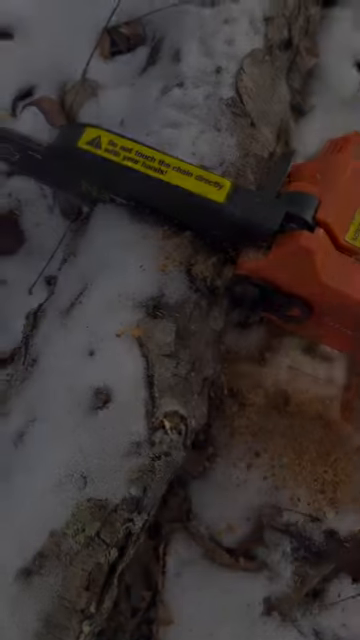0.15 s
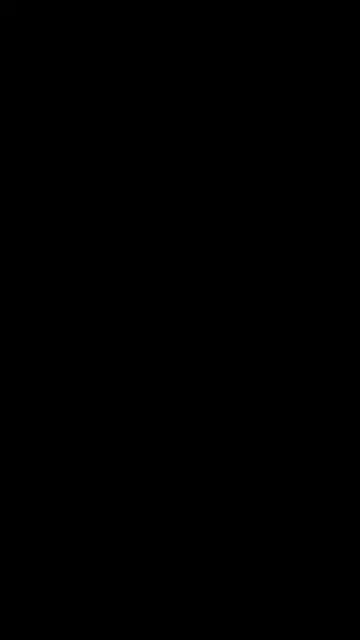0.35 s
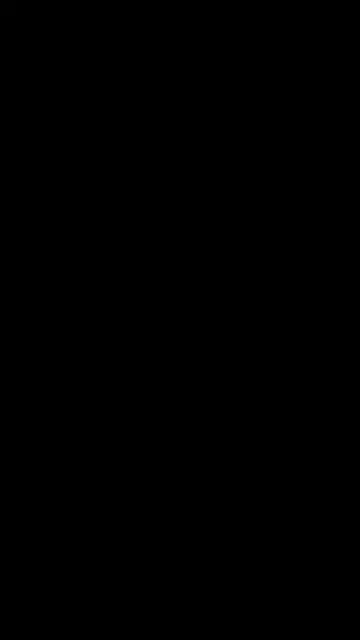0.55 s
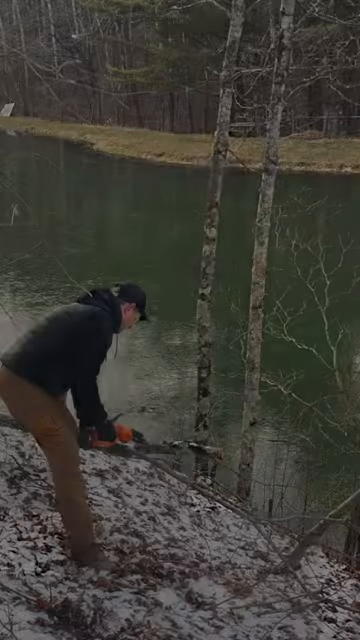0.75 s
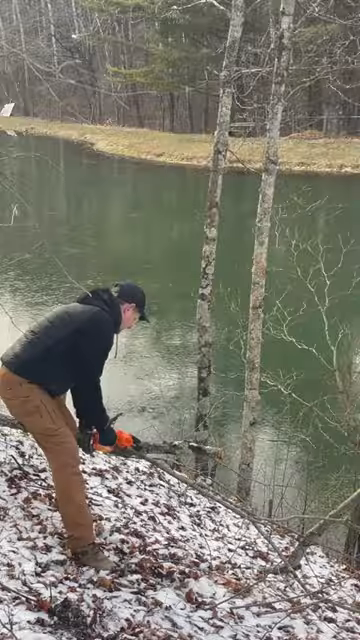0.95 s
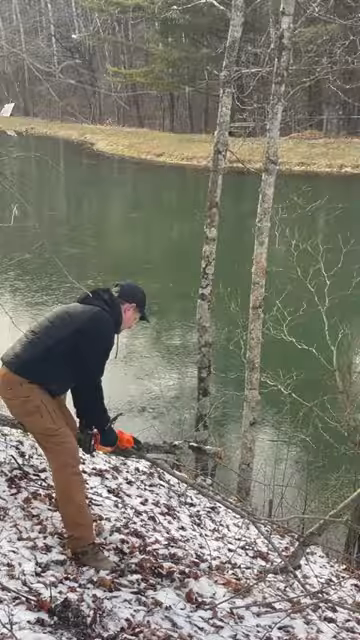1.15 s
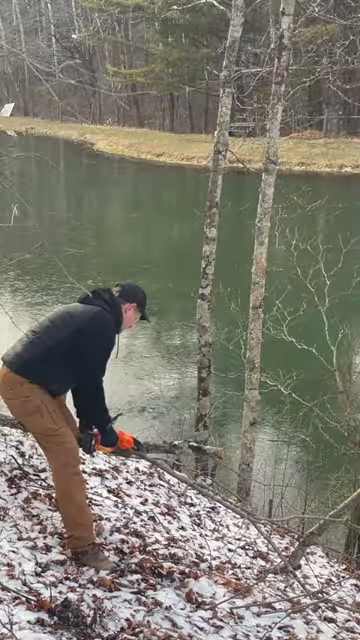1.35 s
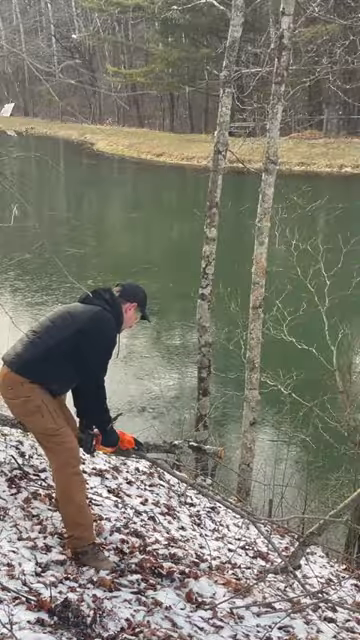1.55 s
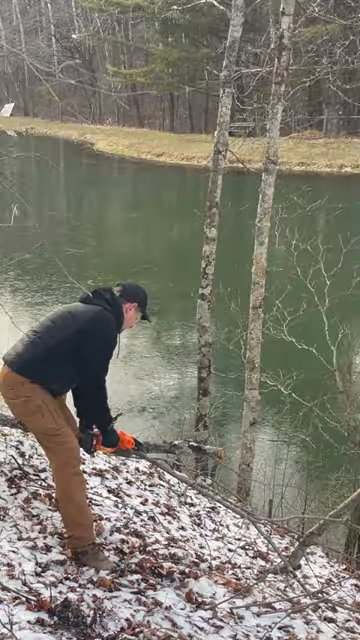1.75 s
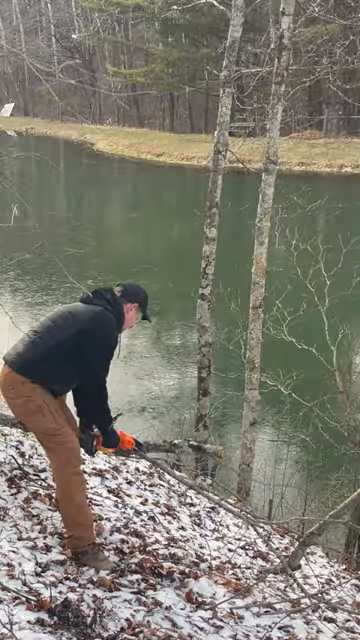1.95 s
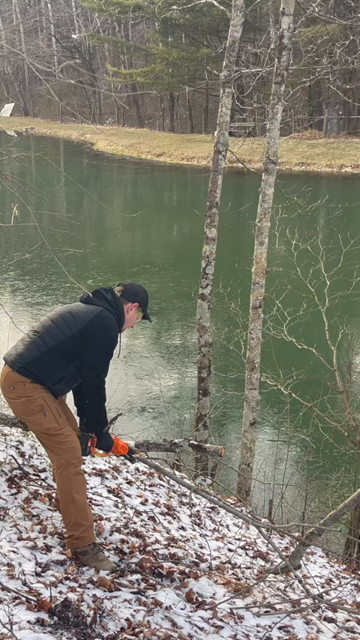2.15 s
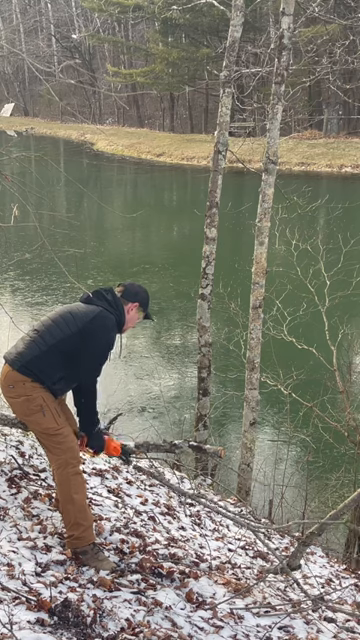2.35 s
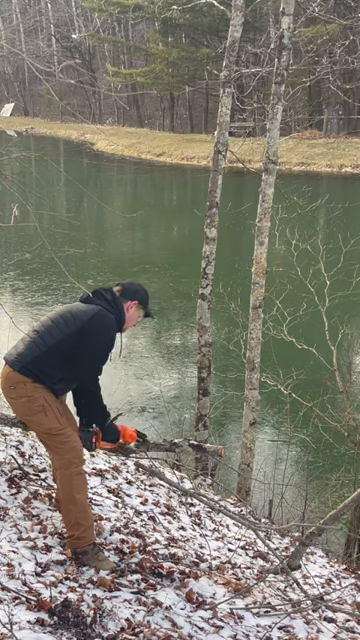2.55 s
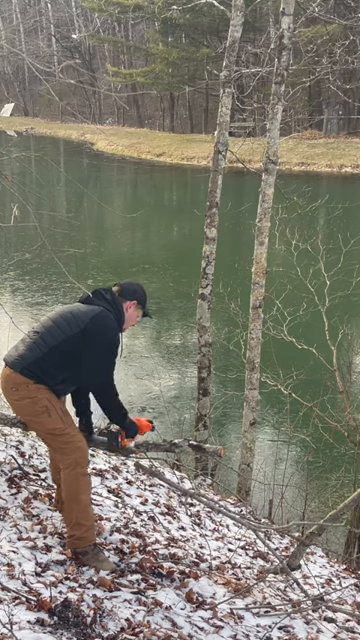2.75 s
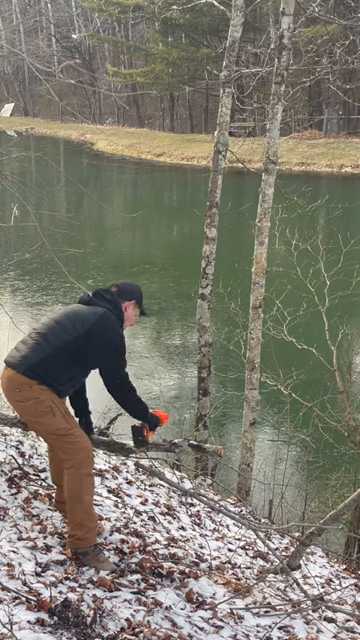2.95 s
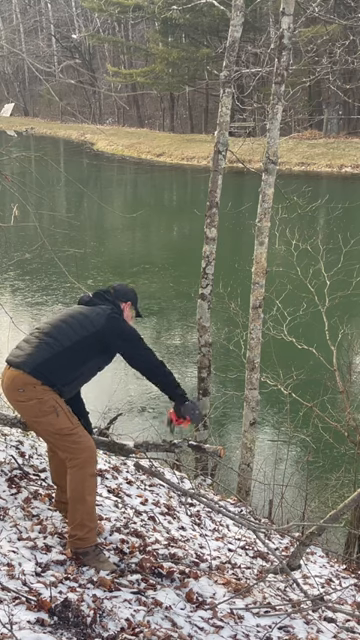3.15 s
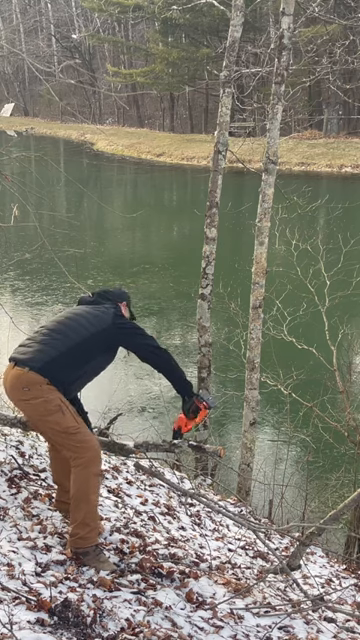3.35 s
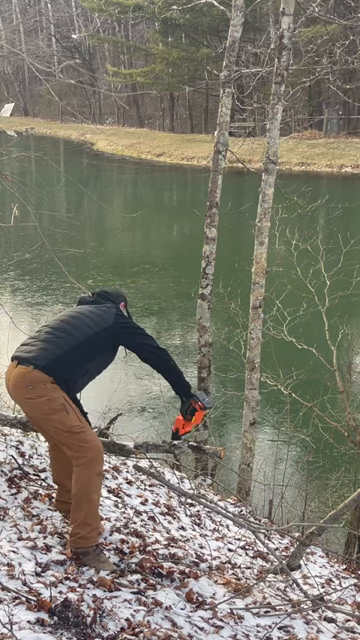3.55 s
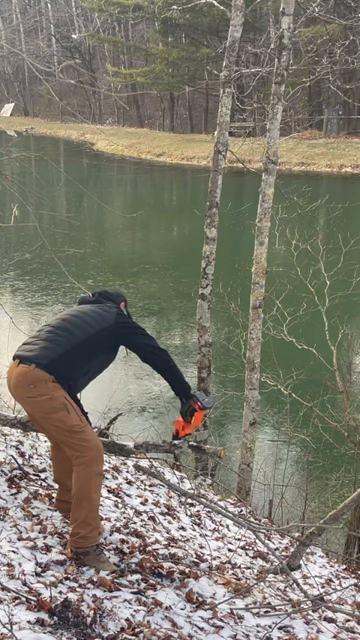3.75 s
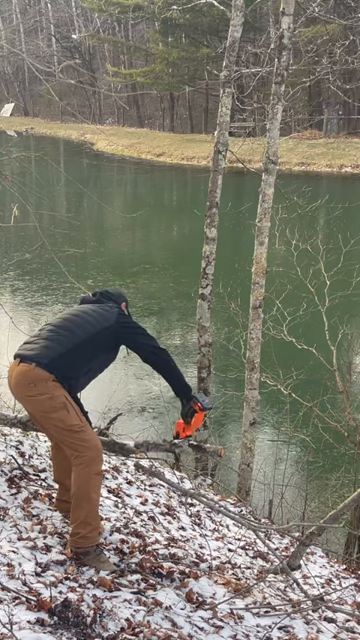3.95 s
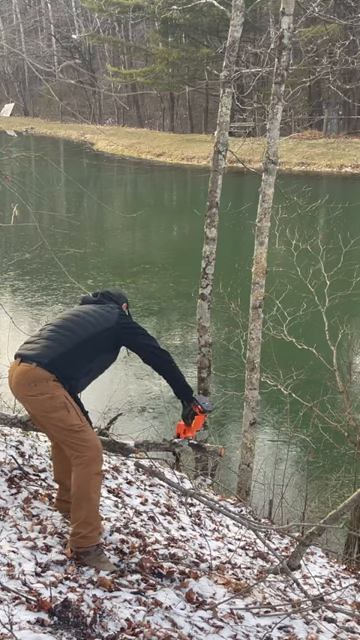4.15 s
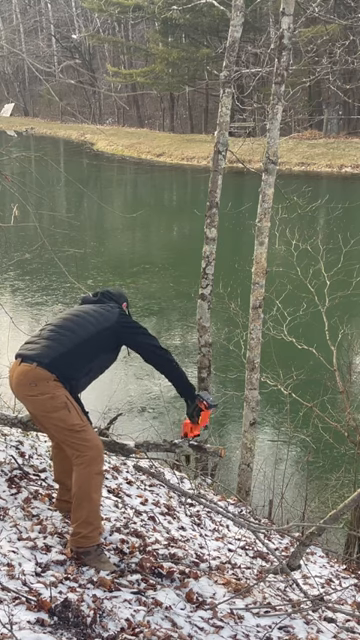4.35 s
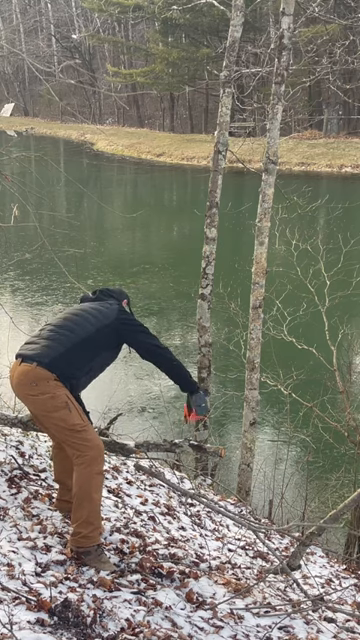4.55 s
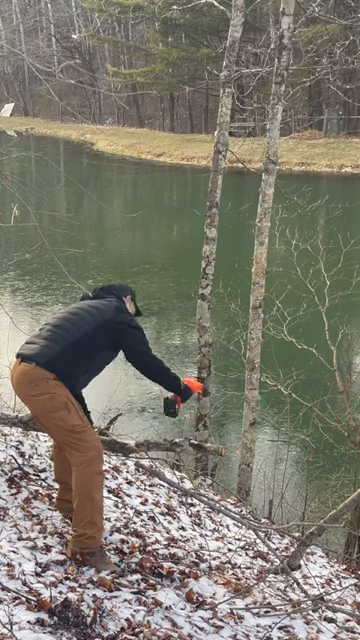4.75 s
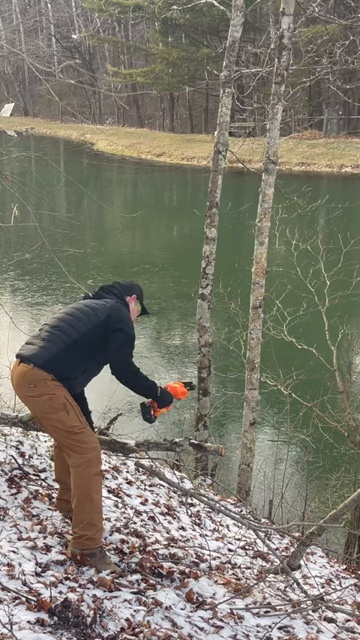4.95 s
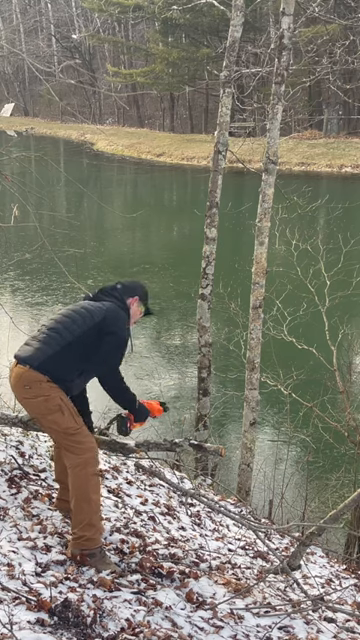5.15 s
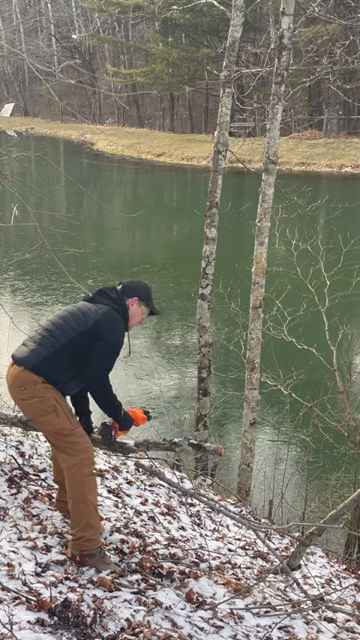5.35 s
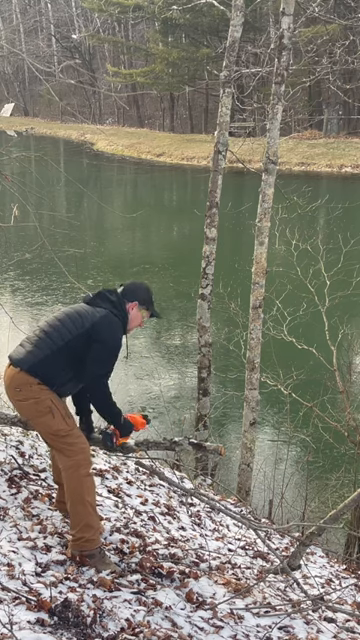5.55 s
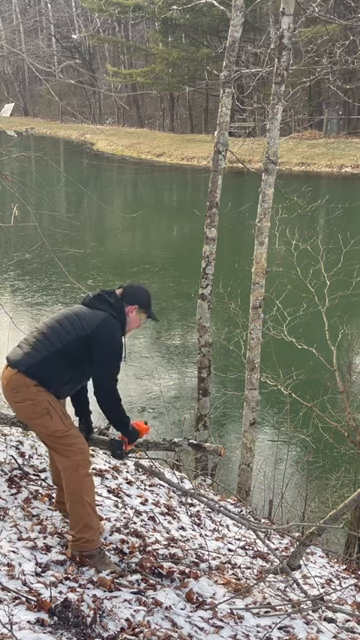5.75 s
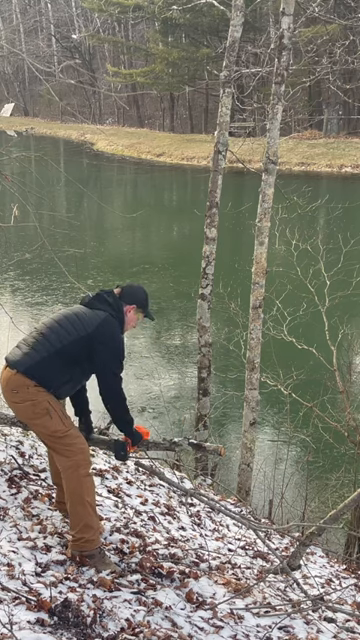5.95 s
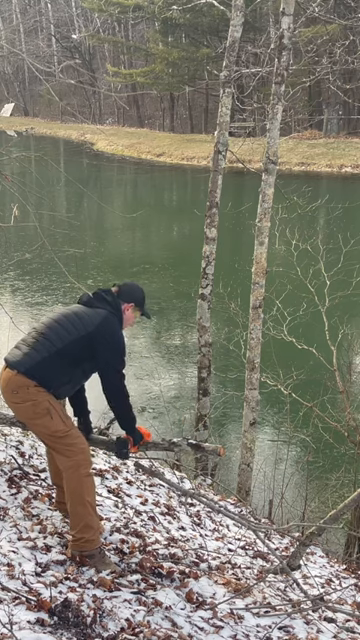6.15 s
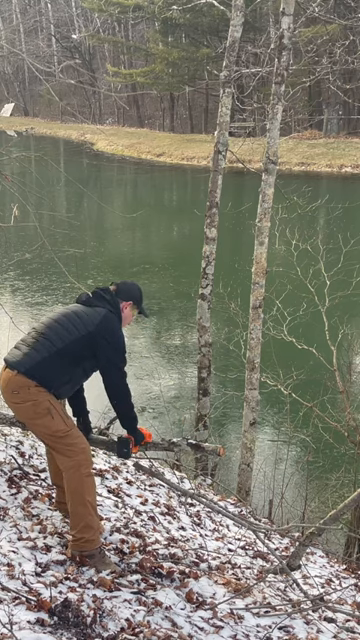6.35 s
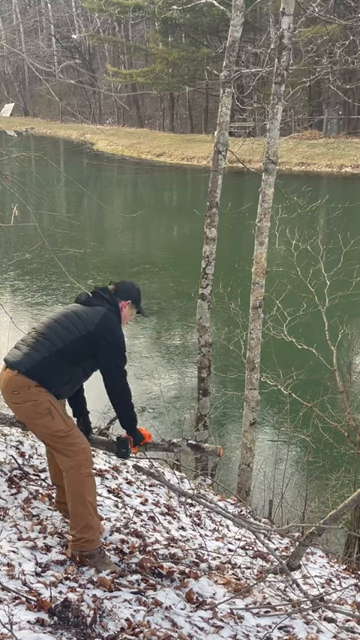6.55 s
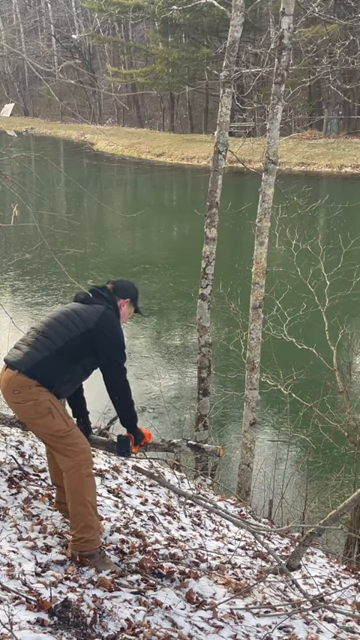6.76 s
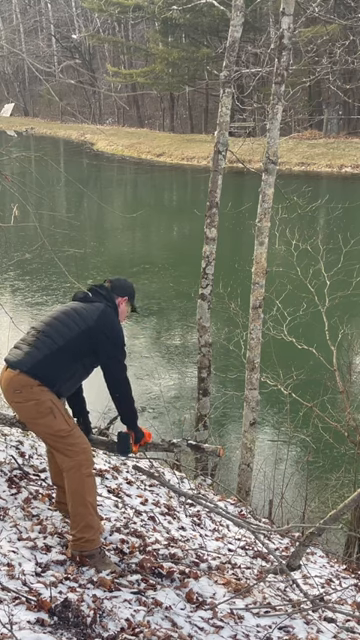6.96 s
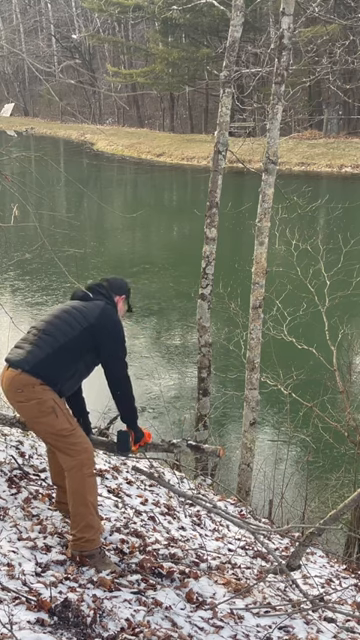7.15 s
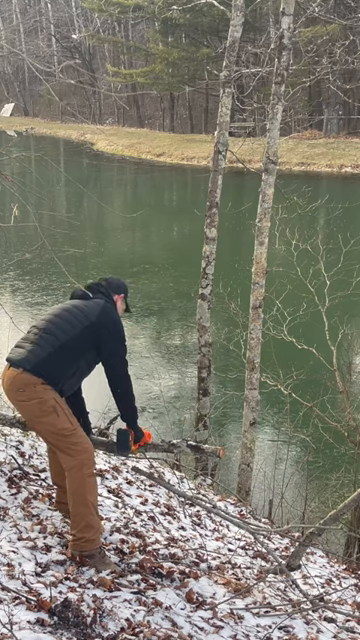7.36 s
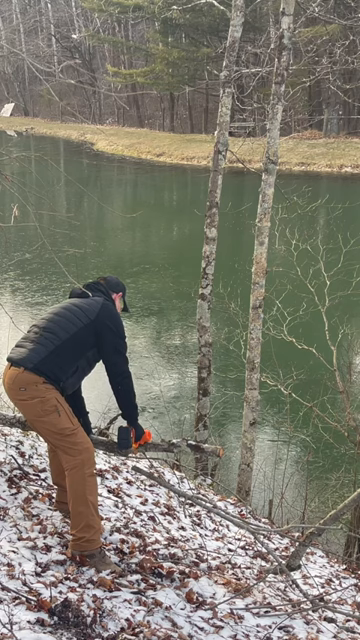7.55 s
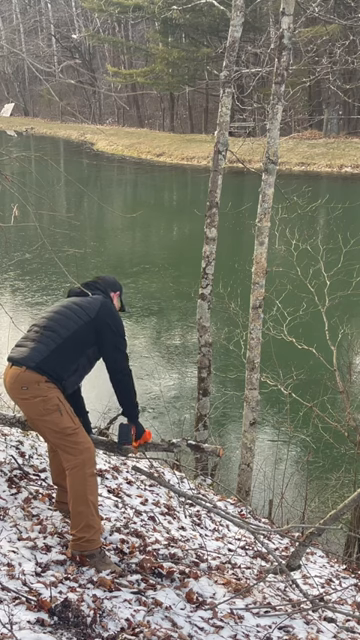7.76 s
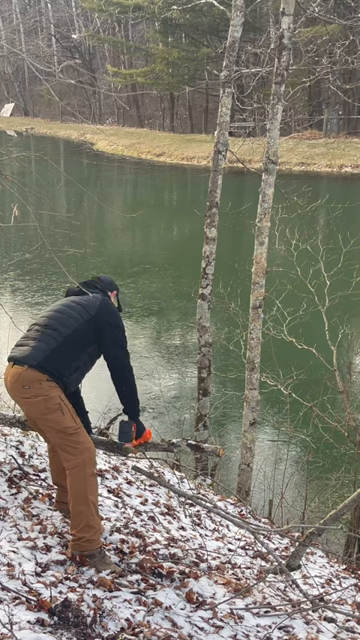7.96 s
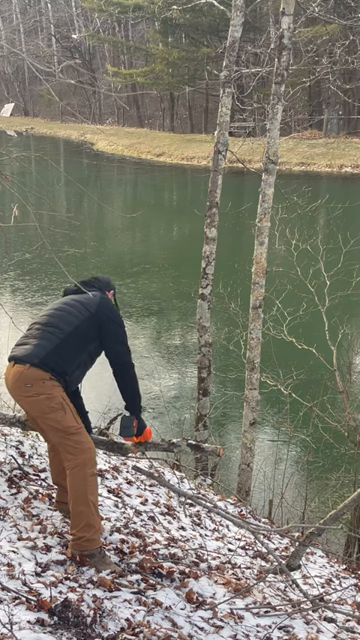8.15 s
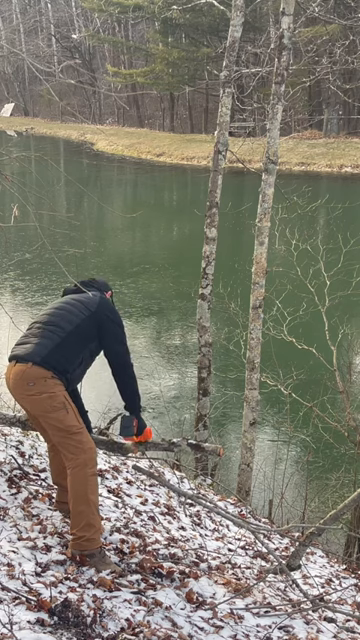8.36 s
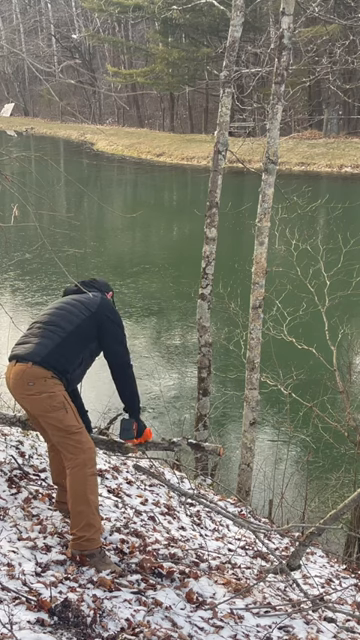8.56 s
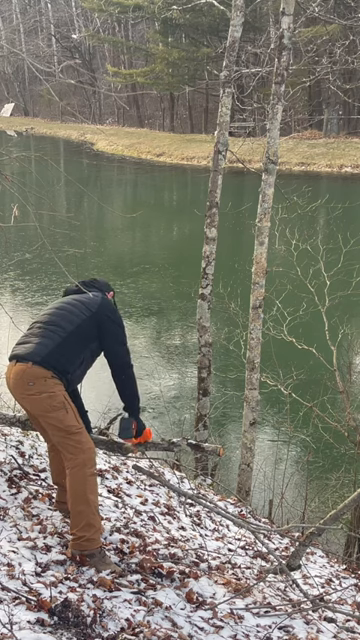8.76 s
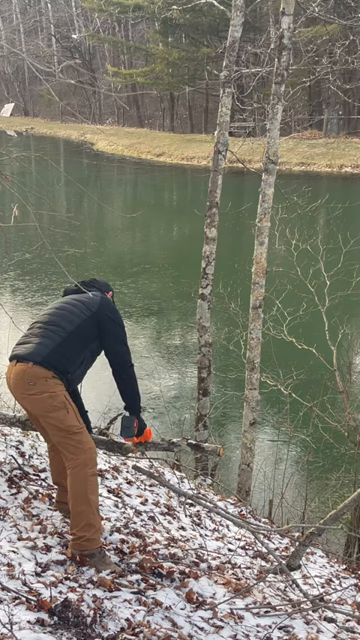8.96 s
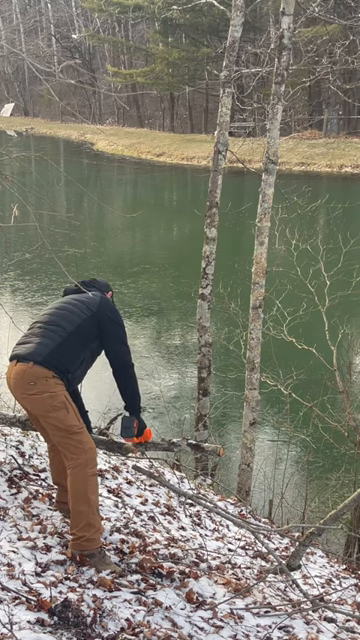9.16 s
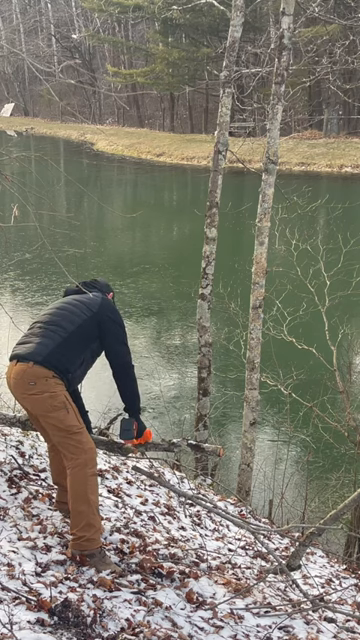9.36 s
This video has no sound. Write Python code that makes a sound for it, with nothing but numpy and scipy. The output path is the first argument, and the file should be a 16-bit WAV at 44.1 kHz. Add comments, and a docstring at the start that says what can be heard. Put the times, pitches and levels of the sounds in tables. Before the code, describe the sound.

A small battery chainsaw whirrs and rasps through a branch outdoors, stops twice with rustling pauses, then restarts and labours with squeals and snags.

```python
"""Small chainsaw in winter woods

A battery chainsaw runs outdoors among bare trees, first close by, then fading to a view from farther off.
Gear noise rings through its casing, motor tones follow its speed, and the cut adds rasp, snags and squeals.
It runs free, slows in the wood, stops twice and starts again. Far traffic-like rumble, rustling leaves,
twig ticks and a thin scattered echo from the trees fill the pauses.
The finished sound, no part of the woods, ends steeply in the treble and flickers in a narrow band on top."""
import sys
import numpy as np
from scipy import signal
from scipy.fft import rfft, irfft, next_fast_len
from scipy.io import wavfile
from scipy.ndimage import uniform_filter1d, map_coordinates

SR = 44100
rng = np.random.default_rng(int(sys.argv[2]) if len(sys.argv) > 2 else 0)


def log_audio(samples):
    """Write samples as a 16-bit WAV file to the path given in sys.argv[1]."""
    # one column per channel
    frames = np.atleast_2d(samples).T
    # limit to full scale, then quantise
    limited = np.clip(frames, -1, 1)
    pcm = np.round(limited * 32767).astype(np.int16)
    wavfile.write(sys.argv[1], SR, pcm)


def makeup_ratio(level_db):
    """Linear amplitude ratio for a level in decibels (20 dB per factor of ten)."""
    decades = np.asarray(level_db, float) / 20
    return 10 ** decades


N = 415422

# the view of the saw: fade to the far view starts, ends, then the saw is turned in each pause [s]
VIEW_TIMES = [.25, .6, 2.8, 5.2]
# how roughly the cut runs, lifting rasp and small snags: (time [s], lift [dB])
ROUGHNESS = [(0, 0), (6.2, 0), (6.6, 2.5), (7.2, 2.5), (7.9, -1), (9.42, -3)]


def unit(x):
    """Scaled to rms 1."""
    return x / np.sqrt(np.mean(x ** 2) + 1e-20)


def read(points, t):
    """A (time, value) curve read at times t."""
    return np.interp(t, *np.transpose(points))


def along(points, hz):
    """(Hz, value) points read on a log frequency axis."""
    f, v = np.transpose(points)
    return np.interp(np.log(hz + 1), np.log(f + 1), v)


def wobble(rate):
    """A smooth random curve, rate knots a second."""
    return map_coordinates(rng.standard_normal(int(N * rate / SR) + 4), [np.arange(N) * rate / SR])


def filtered(x, response):
    """x times a response of frequency."""
    m = next_fast_len(N + SR // 2)
    return irfft(rfft(x, m) * response(np.fft.rfftfreq(m, 1 / SR)), m)[..., :N]


def hiss(spectrum):
    """Noise of rms 1, coloured by (Hz, dB per Hz) points."""
    return unit(filtered(rng.standard_normal(N), lambda hz: makeup_ratio(along(spectrum, hz))))


def facing(t):
    """Share of each view of the saw (close, first, second, third) at times t."""
    place = np.interp(t, VIEW_TIMES[:2], [0, 1]) + (t > VIEW_TIMES[2]) + (t > VIEW_TIMES[3])
    return np.array([np.clip(1 - abs(place - view), 0, 1) for view in range(4)])


def motor(t):
    """Motor speed (0-1) under trigger and brake, load, bite (0-1), and the layer levels (dB) they call for."""
    # the trigger: (pressed [s], released [s])
    presses = [(-1, 2.256), (3.203, 4.49), (5.71, 11)]
    # how hard the chain bites the wood: (time [s], load [0 free, 1 heavy])
    load_curve = [(0, .8), (.47, .8), (.58, .06), (1.2, .09), (1.4, .85), (2.04, .85), (2.14, .11),
                  (2.4, .11), (3.4, .03), (3.9, .03), (4.05, .5), (4.09, .2), (4.18, 1), (4.28, .1),
                  (4.32, .06), (4.34, .5), (4.43, 0), (6.05, .12), (6.25, 1.05), (6.5, .75), (6.74, 1.1),
                  (6.87, .6), (6.97, 1.1), (7.2, .75), (8.2, .75), (8.31, 1.6), (8.41, 1), (8.65, 1),
                  (8.8, .65), (9.1, 1), (9.27, .55), (9.42, .75)]
    # one row a view (close, first, second, third), each column pair free then cutting: (whine [dB] x2,
    # once-a-turn tone [dB] x2, casing band below 2.2 kHz against the whirr [dB] x2, rasp [dB] x2)
    layer_levels = [(-60, -60, -70, -70, -3.5, -3.5, -50, -50),
                    (-40, -45, -51, -55, -8.5, -6.5, -63, -46.5), (-36, -36, -47, -52, 1, -2, -67, -48.5),
                    (-35.5, -45, -50, -62, -4.5, -2.7, -62, -47)]
    spin_up_s, spin_up_bend = .09, 2  # time constant and shape of the rise
    brake_s, brake_bend = .122, 3  # time to standstill and shape of the fall
    touch, sink = .12, .3  # load at which the cutters touch the wood, and how much more sinks them fully
    speed = 0
    for on, off in presses:
        rise = 1 - np.exp(-(np.clip(t - on, 0, None) / spin_up_s) ** spin_up_bend)
        fall = 1 - np.clip((t - off) / brake_s, 0, 1) ** brake_bend
        speed = speed + rise * fall
    load = np.clip(read(load_curve, t), 0, None)
    bite = np.clip((load - touch) / sink, 0, 1)
    db = np.transpose(layer_levels) @ facing(t)
    free_db, cutting_db = db[0::2], db[1::2]
    return speed, load, bite, free_db + bite * (cutting_db - free_db)


def colour_db(hz, t):
    """The saw's spectrum with its casing and bar resonances, changing with the view."""
    # colour of the running saw in the four views: (frequency [Hz], density [dB per Hz])
    close_colour = [(180, -33), (300, -16.5), (570, -17), (1140, -14.5), (1590, -16), (2080, -10),
                    (2840, -14.5), (4700, -13.5), (7590, -6.5), (8250, -14.5)]
    first_colour = [(180, -59), (300, -25), (480, -14.5), (800, -8), (1170, -10), (1660, -7.5),
                    (3260, -5.5), (5490, -5), (6500, -3), (8690, -2), (9400, -8)]
    second_colour = [(180, -50), (300, -26.5), (480, -12), (760, -6), (950, -11), (1400, -11), (1770, 0),
                     (2200, -9), (3260, -12.5), (6910, -15.5), (8690, -8), (9500, -13)]
    third_colour = [(180, -41), (300, -22), (450, -8.5), (718, -2.5), (1210, -9), (1720, -2), (2550, -4.5),
                    (3210, -5), (5500, -8.5), (6910, -10), (8050, -3), (9380, -12)]
    # casing and bar resonances: (centre [Hz], width [Hz], lift close, first, second, third view [dB])
    resonances = [(795, 160, -0.5, 2, 4.7, 7.7), (1730, 170, 4, 3.1, 4.55, 4.6),
                  (2850, 52, -3, 1.8, 0.34, 1.4), (3500, 41, 5.5, 2.3, 4.5, 1.3),
                  (3980, 360, 5.5, 5.8, 3.4, 3.7), (6250, 280, 2.5, 3.3, 3.8, 4.2),
                  (8400, 570, 0.5, 1, 0.68, 2)]
    colours = (close_colour, first_colour, second_colour, third_colour)
    views = np.array([along(colour, hz) for colour in colours])
    for centre_hz, width_hz, *lift_db in resonances:
        views = views + np.outer(lift_db, 1 / (1 + (2 * (hz - centre_hz) / width_hz) ** 2))
    return views.T @ facing(t)


def gears(turn):
    """Gear and chain rattle: noise pulsing once a motor turn, through the casing."""
    drive = rng.standard_normal(N) * (1 + .22 * np.cos(turn)) * makeup_ratio(0.94 * wobble(160))
    hz, t, z = signal.stft(drive, SR, nperseg=512)
    field = makeup_ratio(colour_db(hz, t))
    high, low = (hz > 3300) & (hz < 9500), (hz > 500) & (hz < 2200)
    field = field / np.sqrt(np.sum(field[high] ** 2, axis=0) / len(hz))  # the whirr sets the level
    casing_db = motor(t)[3][2] - 10 * np.log10(np.sum(field[low] ** 2, axis=0) / len(hz))
    lean = np.clip((3000 - hz) / 800, 0, 1)  # load shifts power between casing and whirr
    patches = uniform_filter1d(rng.standard_normal(z.shape), size=5, axis=0)
    patches = uniform_filter1d(patches, size=9, axis=1)
    z = z * field * makeup_ratio(np.outer(lean, casing_db - 1.0) + 1.5 * unit(patches))
    return signal.istft(z, SR, nperseg=512)[1][:N]


def motor_tones(turn, whine_db, shaft_db, uneven):
    """The whine sounds twice a motor turn, the shaft tone once; both waver in level."""
    whine = makeup_ratio(whine_db + 1.5 * wobble(30) + 3 * uneven * wobble(8)) * np.sin(2 * turn)
    shaft = makeup_ratio(shaft_db + 0.77 * wobble(25)) * np.sin(turn)
    return np.sqrt(2) * (whine + shaft)


def cutting_rasp(teeth, rasp_db, bite):
    """Wood torn by the passing cutters: low noise shaped by their uneven bite."""
    # colour of the rasp: (frequency [Hz], density [dB per Hz])
    rasp_colour = [(70, -29.5), (120, -0.5), (200, 1), (330, -10.5), (520, -1.5), (900, -23), (2000, -42)]
    rough_db = bite * read(ROUGHNESS, np.arange(N) / SR)
    return makeup_ratio(rasp_db + rough_db + 3 * wobble(12)) * unit(teeth * hiss(rasp_colour))


def squeals(teeth):
    """Narrow, rough notes that slide and change level as the bar works in the wood, throbbing with the cutters."""
    # squeal of bar and chain in the kerf, one row a note:
    # (start [s], end [s], first pitch [Hz], last pitch [Hz], first level [dB], last level [dB])
    notes = [(0, .16, 2490, 2470, -28, -29), (.16, .55, 2360, 2520, -33, -41),
             (1.39, 2.12, 6250, 6030, -33, -40), (5.755, 5.82, 2660, 2610, -30, -36),
             (5.85, 6.1, 2780, 2900, -41, -39), (6.12, 6.32, 2920, 3030, -37, -32),
             (6.29, 6.86, 2580, 2450, -33, -39), (6.875, 6.93, 2640, 2440, -30, -33),
             (6.93, 7.14, 2510, 2460, -33, -37), (7.15, 8, 2510, 2400, -34, -38),
             (7, 7.6, 3540, 3470, -44, -39), (7.58, 8.2, 3470, 3440, -36, -40),
             (7.97, 8.2, 2380, 2130, -38, -40), (8.22, 8.42, 2330, 2560, -34, -33),
             (8.4, 8.7, 2930, 2910, -35, -34), (8.69, 9.06, 2550, 2600, -32, -33),
             (9.03, 9.42, 2920, 2950, -36, -40), (9.13, 9.45, 2590, 2580, -33, -31),
             (8.65, 9.45, 7780, 7800, -36, -36)]
    t, out = np.arange(N) / SR, np.zeros(N)
    for start, end, first_hz, last_hz, first_db, last_db in notes:
        done = np.interp(t, [start, end], [0, 1])
        fade = np.interp(t, [start - .02, start + .01, end - .03, end + .02], [0, 1, 1, 0])
        width_hz = first_hz / 15
        phase = 2 * np.pi * np.cumsum(first_hz + (last_hz - first_hz) * done) / SR
        note = .65 * np.cos(phase + 1.2 * wobble(40))  # a singing core inside the rough band
        for part in (np.cos, np.sin):
            note = note + (wobble(width_hz) + .5 * wobble(2.5 * width_hz)) * part(phase)
        level_db = first_db + (last_db - first_db) * done + 2 * wobble(18)  # random swell along a note
        out += makeup_ratio(level_db) * fade * unit(teeth * note)
    return out


def saw():
    """Motor speed and load drive gears, tones and rasp; squeals and snags join at their own times."""
    # gear whirr at full speed: (time [s], level [dB])
    whirr_curve = [(0, -28.5), (.2, -30.5), (.42, -32), (.7, -30), (.95, -27.7), (1.3, -26.2), (1.6, -27.2),
                   (2.3, -28), (3.3, -33), (3.9, -29.7), (4.25, -29.5), (4.55, -32), (5.8, -31.5),
                   (6.05, -29), (6.6, -32), (7.2, -31), (7.8, -32.5), (8.4, -31), (9.42, -30.5)]
    free_hz, sag_hz, hunt_hz = 846, 150, 30  # whine running free, its drop and its hunting at load 1
    tones_grow, whirr_grows, whirr_dies = 4, .5, 1.5  # powers of the motor speed
    ring_out_s, ring_out_db = .018, -12  # the slack chain rattles on briefly
    t = np.arange(N) / SR
    speed, load, bite, (whine_db, shaft_db, _, rasp_db) = motor(t)
    hz = speed * (free_hz - load * (sag_hz + hunt_hz * wobble(9)))
    uneven = np.clip(2.5 * load - 1, 0, 1)  # a slowed motor runs unevenly
    turn = np.pi * np.cumsum(uniform_filter1d(hz, size=800)) / SR + (.06 + .5 * uneven) * wobble(70)
    tones = motor_tones(turn, whine_db, shaft_db, uneven)
    teeth = makeup_ratio(1.05 * wobble(45))  # cutters bite unevenly
    teeth = teeth * (1 + .3 * np.cos(2 * np.pi * np.cumsum(42 + 6 * wobble(8)) / SR))  # and pass in a quick throb
    rasp = cutting_rasp(teeth, rasp_db, bite)
    whirr_db = read(whirr_curve, t) + .7 * wobble(14)
    rattle = makeup_ratio(whirr_db) * gears(turn) * teeth ** (0.28 * uneven)
    # rises early under power and dies early on the brake
    running = speed ** np.where(np.gradient(speed) < 0, whirr_dies, whirr_grows)
    keep = np.exp(-1 / (ring_out_s * SR))
    running = np.maximum(running, makeup_ratio(ring_out_db) * signal.lfilter([1 - keep], [1, -keep], running))
    return running * (rattle + rasp) + speed ** tones_grow * tones + squeals(teeth) + snags()


def woods():
    """Distant rumble, and a patchy rustle of leaves and cloth with small crackles: two coloured noises."""
    # colour of the far rumble: (frequency [Hz], density [dB per Hz])
    rumble_colour = [(20, -42), (38, -19.5), (50, -10), (61, 5.5), (70, -5.5), (81, 5.5), (92, -1.5),
                     (125, -12.5), (200, -19.5), (320, -25.5), (500, -51)]
    # colour of the rustle: (frequency [Hz], density [dB per Hz])
    air_colour = [(180, -26.5), (300, -7), (514, -12), (1020, -17), (2080, -13), (4900, -19), (8150, -14),
                  (9150, -14), (9700, -40), (12600, -75.5), (21300, -120)]
    # far rumble, before its trim: (time [s], level [dB])
    rumble_curve = [(0.0, -70), (0.26, -61), (0.86, -51.5), (2.83, -49.5), (5.8, -51), (6.58, -47.5),
                    (7.5, -49), (9.42, -49)]
    # rustle, one list a pause, before its trim: (time [s], level [dB])
    rustle_curves = [
        [(2.42, -58), (2.562, -59), (2.824, -65.5), (3.042, -65), (3.19, -58.5)],
        [(4.63, -55), (4.716, -51), (5.026, -62), (5.48, -66.5), (5.68, -66.5)],
    ]
    t = np.arange(N) / SR
    rumble = makeup_ratio(read(rumble_curve, t) + 3.2 + .8 * wobble(4.6)) * hiss(rumble_colour)
    z = signal.stft(hiss(air_colour), nperseg=256)[2]
    patches = uniform_filter1d(rng.standard_normal(z.shape), size=14, axis=0)
    patches = uniform_filter1d(patches, size=12, axis=1)
    air = unit(signal.istft(z * makeup_ratio(1.8 * unit(patches)), nperseg=256)[1][:N])
    crackle = 1 + 1.5 * np.clip(wobble(180) - 1.6, 0, 3)
    rustle_db = read(np.concatenate(rustle_curves), t) - 1.5 + 1.3 * wobble(19)
    return rumble + makeup_ratio(rustle_db) * crackle * air


def leaf_ticks():
    """Faint chance ticks underfoot, as (time s, level dB, Hz, thud dB) rows."""
    level_db, centre_hz, per_s = -47.5, 8200, 6
    draw = rng.random((int(per_s * N / SR), 3))
    return [(s * N / SR, level_db + 5 * (u - .5), centre_hz * (.9 + .2 * v), -22) for s, u, v in draw]


def trees(x):
    """Trunks and the far bank scatter a thin, delayed tail, each frequency dying at its own speed."""
    # how long the woods ring: (frequency [Hz], t60 [s])
    decay_times = [(300, 0.87), (830, 2.8), (1500, 1.2), (4000, 1.33), (9000, 1.07)]
    hz, t, z = signal.stft(rng.standard_normal(SR), SR, nperseg=256)
    tail = signal.istft(z * makeup_ratio(-60 * t / along(decay_times, hz)[:, None]), SR, nperseg=256)[1]
    return signal.fftconvolve(np.pad(x, (1300, 0)), tail / np.linalg.norm(tail))[:N]


def flicker(mid):
    """Top band of the finished sound: thin noise that follows the treble and switches at random."""
    # the band before its filter: (time [s], level against the treble [dB], greatest share of time on [0-1])
    flicker_curve = [(0, -25, .3), (.5, -22, .6), (4.6, -21, .8), (5.75, -26, .5), (6.1, -28, .1),
                     (7.4, -29, .1), (7.6, -26, .7), (9.42, -24, .6)]
    s, levels_db, shares = np.transpose(flicker_curve)
    t = np.arange(N) / SR
    db, share = np.interp(t, s, levels_db), np.interp(t, s, shares)
    treble = np.sqrt(abs(uniform_filter1d(filtered(mid, lambda hz: hz > 6000) ** 2, size=1024)))
    step = 1024  # samples between switches
    chance = share * np.clip(treble / makeup_ratio(-50), .2, 1)  # rarer in the quiet
    on = np.repeat(rng.random(N // step + 1), step)[:N] < chance
    noise = makeup_ratio(db) * treble * on * rng.standard_normal(N) * 6
    return filtered(noise, lambda hz: np.exp(-((hz - 11350) / 260) ** 4))


def small_snags():
    """Weak snags as the chain chatters in the kerf: (time s, level, knock, ring dB) rows."""
    chatter_s, scatter = .0345, .12  # interval of the chatter, and its unevenness as a share of it
    level_db, spread_db = -22.5, 2.5
    draw = rng.standard_normal((int(N / SR / chatter_s), 4))
    s = chatter_s * (np.arange(len(draw)) + scatter * draw[:, 0])
    db = level_db + read(ROUGHNESS, s) + spread_db * draw[:, 1]
    rows = np.array([s, db, -15 + 3 * draw[:, 2], -10 + 3 * draw[:, 3]]).T
    return list(rows[(motor(s)[2] > .5) & (s > VIEW_TIMES[1])])


def snags():
    """A cutter snags in the wood: each is a short rough burst that rings casing and wood."""
    # the hardest snags, before trims: (time [s], level [dB], low knock and middle ring against it [dB])
    hard_snags = [(1.409, -14.5, -13, -12), (1.579, -14.5, -18, -14), (1.71, -13.5, -21, -17),
                  (1.894, -13, -14, -14), (1.919, -15, -13, -16), (2.057, -11.5, -32, -10),
                  (3.968, -18, -4, -19), (4.169, -8, -10, -8), (4.217, -13, -8, -21),
                  (4.305, -15, -10, -18), (5.752, -21, -18, -12),  (6.097, -11, -23, -5),
                  (6.237, -14, -12, -21), (6.52, -9.5, -22, -12.5), (6.589, -10.5, -10, -6),
                  (6.622, -16.5, -7, -10), (6.657, -14, -14, -11), (6.733, -8.5, -13.5, -12.5),
                  (6.77, -14, -8, -7), (7.015, -16, -10, -10), (7.117, -21, -19, 2), (7.151, -14, -8, -9),
                  (8.452, -12, -21, -7.5)]
    out, t = np.zeros(N + SR), np.arange(SR // 30) / SR
    burst = np.exp(-t / .0065) * (1 - np.exp(-t / .0006))
    for s, db, knock_db, mid_db in hard_snags + small_snags():
        rings = [(760, knock_db + 9.5), (1700, mid_db + 4.5), (2600, -5.5), (3600, -10.5)]  # (Hz, dB)
        sound = 0.44 * rng.standard_normal(len(t))  # the crack
        for hz, level_db in rings:
            grit = uniform_filter1d(rng.standard_normal(len(t)), size=64)  # splintering spreads each ring
            sound = sound + makeup_ratio(level_db) * unit(grit) * np.sin(2 * np.pi * hz * t)
        out[round(s * SR):][:len(t)] += makeup_ratio(db - 3.0) * burst * sound
    return filtered(out[:N], lambda hz: (1j * hz / (420 + 1j * hz)) ** 2)  # a small saw has no bass


def ticks():
    """Dry cracks of noise, each brightest around its own pitch, with a dull thud."""
    # trigger clicks, twigs and leaves, before trims:
    # (time [s], level [dB], pitch [Hz], thud against it [dB])
    placed_ticks = [(2.835, -37, 1960, 4), (3.0031, -42, 3940, -17), (3.037, -47.5, 7400, -17),
                    (3.1877, -38, 2250, -24), (3.2101, -33, 3310, -20), (4.6713, -38, 5000, -19),
                    (4.781, -22, 4800, -37), (4.9994, -40, 8800, -23), (5.1437, -47, 3360, -17),
                    (5.2905, -44.5, 2680, -13), (5.687, -32, 6330, -20), (5.7114, -36, 2500, -18)]
    out, t = np.zeros(N + SR), np.arange(SR // 20) / SR
    onset = 1 - np.exp(-t / .0007)
    for s, db, hz, thud_db in placed_ticks + leaf_ticks():
        grit = rng.standard_normal((2, len(t)))
        pitched = unit(uniform_filter1d(grit[1], size=36)) * np.sin(2 * np.pi * hz * t)
        crack = 0.4 * np.diff(grit[0], prepend=0) + 0.49 * pitched
        thud = np.sin(2 * np.pi * (140 * t + 4 * (1 - np.exp(-t / .008))))  # falls in pitch
        thud = makeup_ratio(thud_db - 3 - 60 * t / .05) * thud
        out[round(s * SR):][:len(t)] += makeup_ratio(db - 2) * onset * (makeup_ratio(-60 * t / 0.037) * crack + thud)
    return out[:N]


def stereo_difference(mid):
    """Stereo difference: a weak, phase-scrambled copy of the common sound, its bands switching on and off."""
    # bands before their trim, apart from the close view:
    # (frequency [Hz], level against the common sound [dB], share of the time [0-1])
    band_levels = [(60, -22, .9), (340, -19, .95), (700, -18, .9), (1050, -19, .35), (1500, -18, .75),
                   (2100, -21, .35), (2800, -17, .75), (4000, -18, .75), (5000, -19, .45), (6000, -20, .15),
                   (6750, -20, .05), (7000, -18, .9), (8100, -18, .85), (8500, -20, .02), (8900, -8, .7),
                   (10300, -6, .85), (10900, -12, .3), (11200, -60, 0)]
    hz, t, z = signal.stft(mid, SR, nperseg=1024)
    at, level_db, share = np.transpose(band_levels)
    wide = (hz > 2100) * (abs(hz - 6100) > 900)
    # the close view is wider
    close = np.outer(wide, np.interp(t, [VIEW_TIMES[1] - .1, VIEW_TIMES[1] + 0.15], [1, 0]))
    band = (9 * np.log2(hz + 700)).astype(int)
    draw = rng.random((band.max() + 1, len(t) // 4 + 1))[band][:, np.arange(len(t)) // 4]
    on = draw < np.interp(hz, at, share)[:, None] + .8 * close
    gain = makeup_ratio(np.interp(hz, at, level_db)[:, None] + 14.5 * close)
    z = z * on * gain * np.exp(2j * np.pi * rng.random(z.shape))
    return 1.48 * signal.istft(z, SR, nperseg=1024)[1][:N]


def scene():
    """Saw, ticks, echo and woods summed, then spread over two channels by a weak stereo difference."""
    near = saw() + ticks()
    mid = near + makeup_ratio(-33) * trees(near) + woods()
    side = stereo_difference(mid)
    return np.array([mid + side, mid - side])


def top_cut(x):
    """Nothing passes above the cut-off."""
    return signal.sosfilt(signal.butter(12, 11770, fs=SR, output="sos"), x)


def record(dry):
    """Finishes the mix: the common treble is cut at a steep, ragged edge and a flickering band added above."""
    # the edge, before its raggedness: (time [s], frequency [Hz])
    edge_curve = [(0, 8140), (.27, 8220), (.4, 8900), (.5, 9470), (4.5, 9670), (6, 9536), (9.42, 9530)]
    mid, side = (dry[0] + dry[1]) / 2, (dry[0] - dry[1]) / 2
    hz, t, z = signal.stft(mid, SR, nperseg=1024)
    ragged_hz = 120 * np.repeat(rng.standard_normal(len(t)), 2)[:len(t)]
    edge_hz = read(edge_curve, t) + ragged_hz
    mid = signal.istft(z * (hz[:, None] < edge_hz), SR, nperseg=1024)[1][:N]
    mid = mid + flicker(mid)
    return top_cut(np.array([mid + side, mid - side]))


dry = scene()
out = record(dry)
log_audio(out)
```